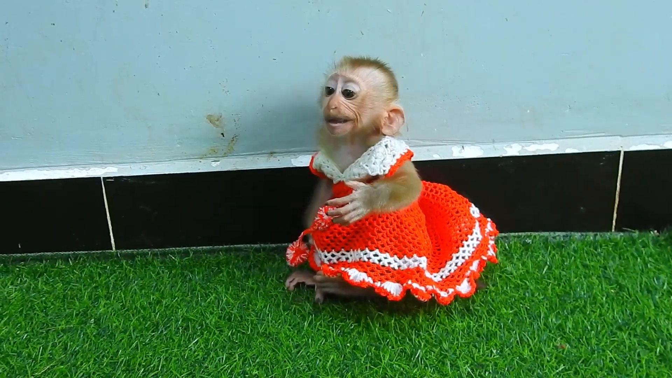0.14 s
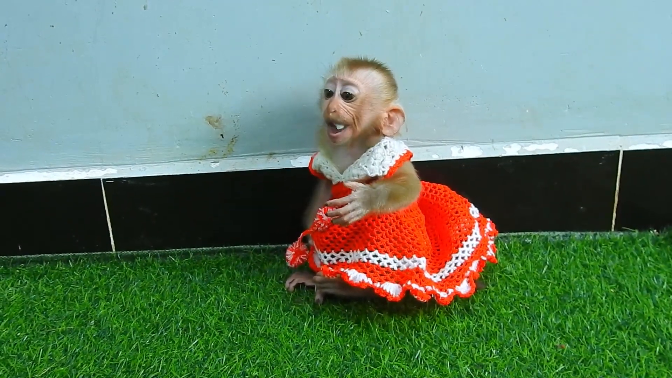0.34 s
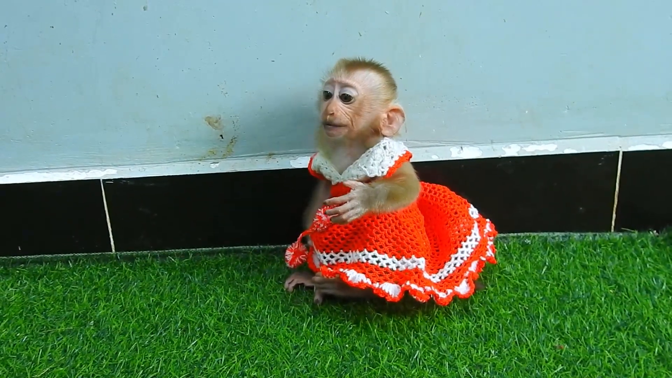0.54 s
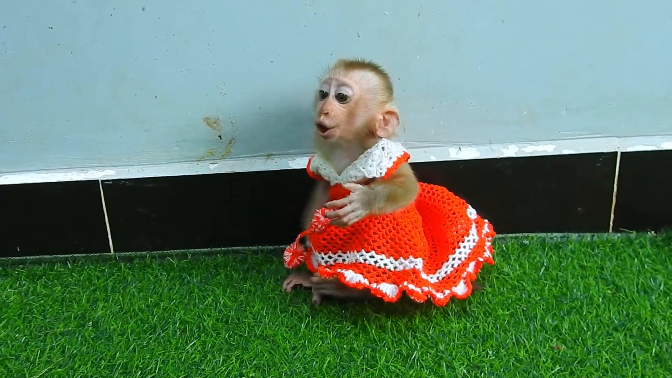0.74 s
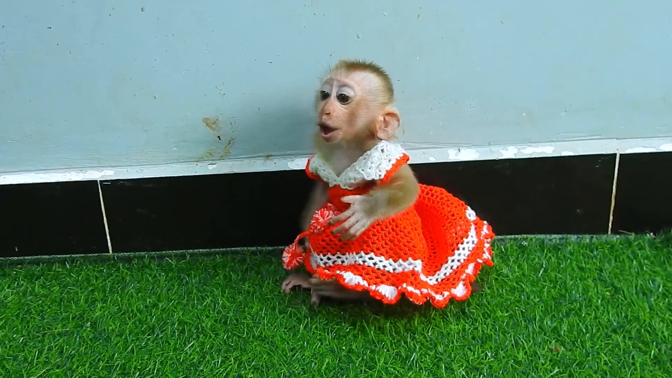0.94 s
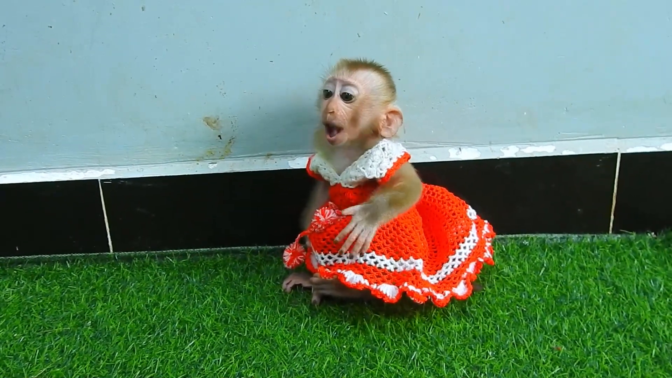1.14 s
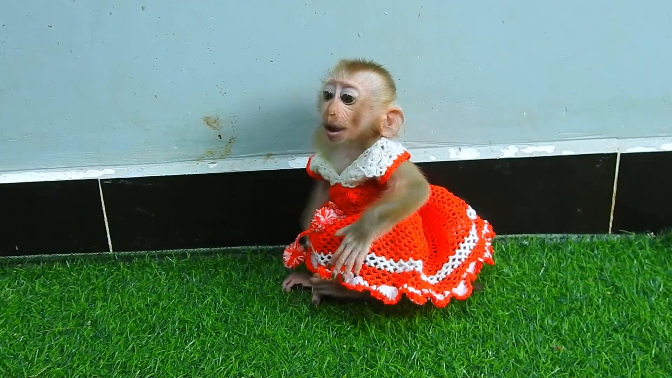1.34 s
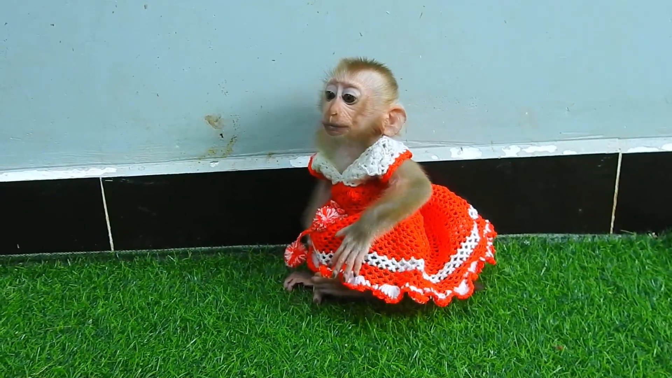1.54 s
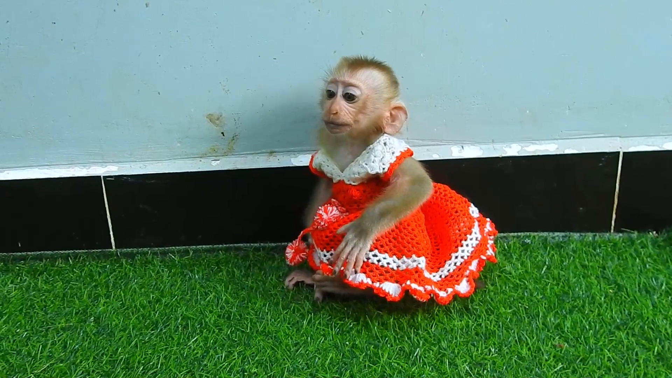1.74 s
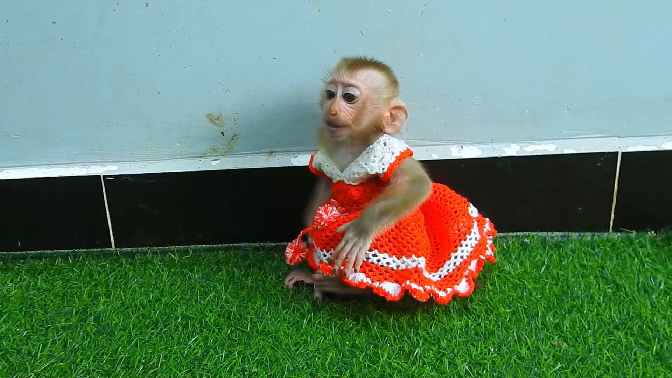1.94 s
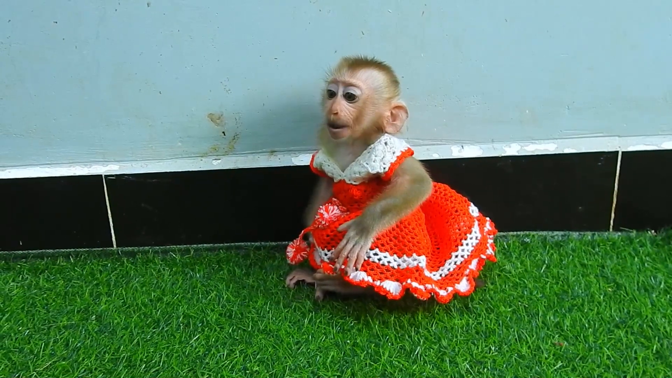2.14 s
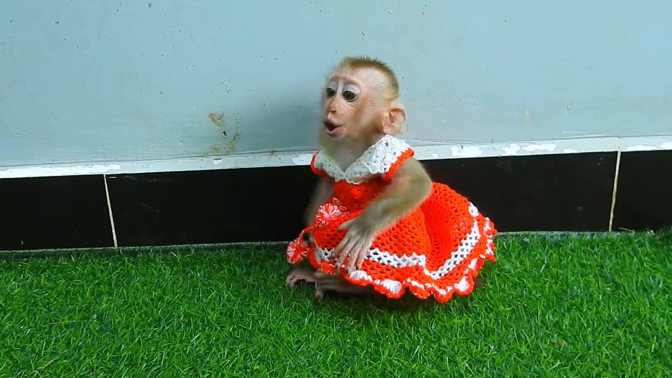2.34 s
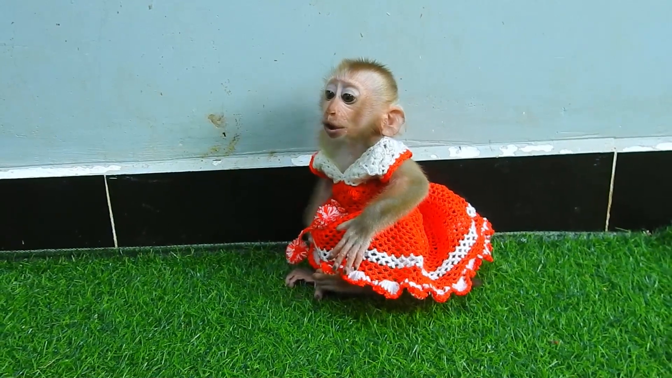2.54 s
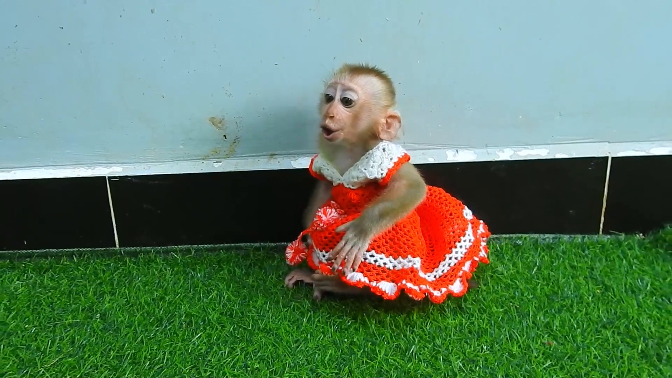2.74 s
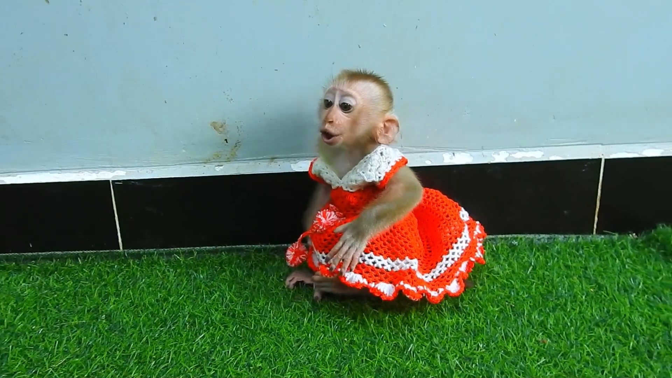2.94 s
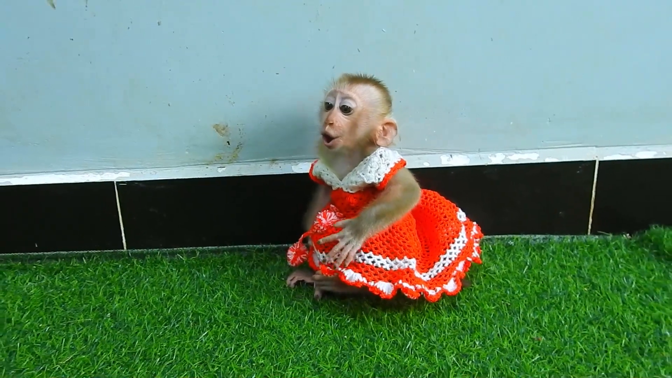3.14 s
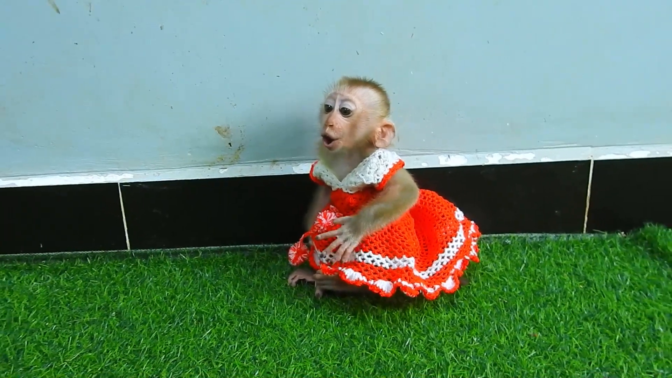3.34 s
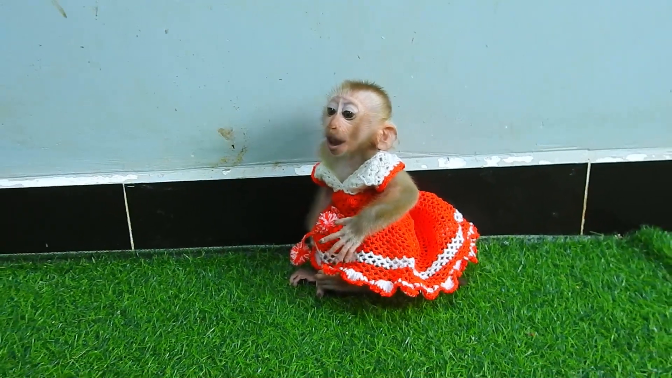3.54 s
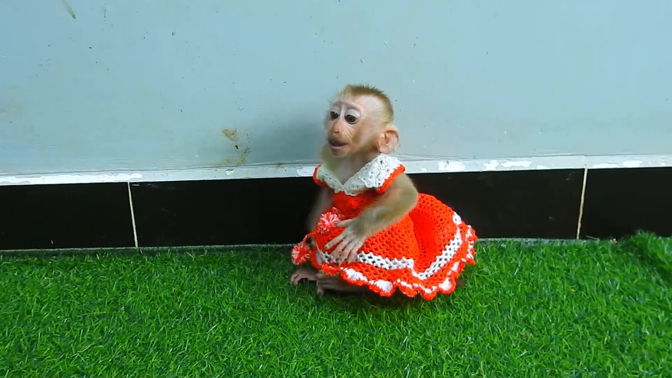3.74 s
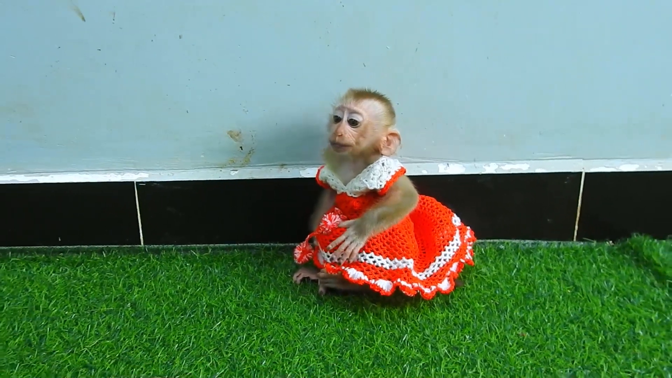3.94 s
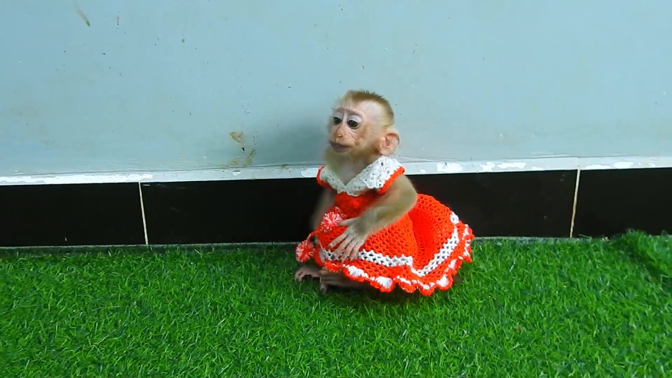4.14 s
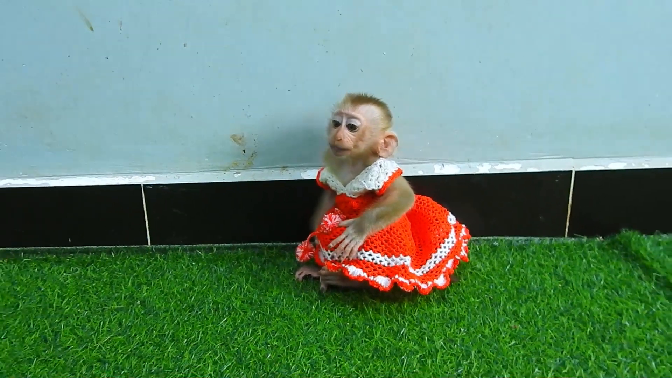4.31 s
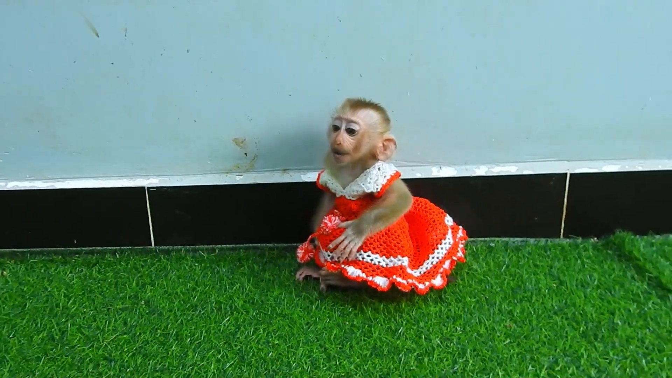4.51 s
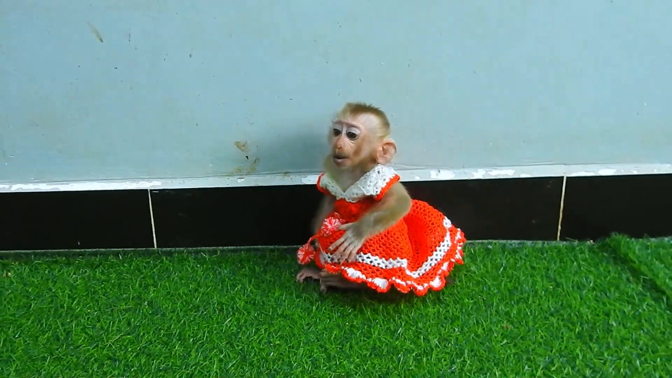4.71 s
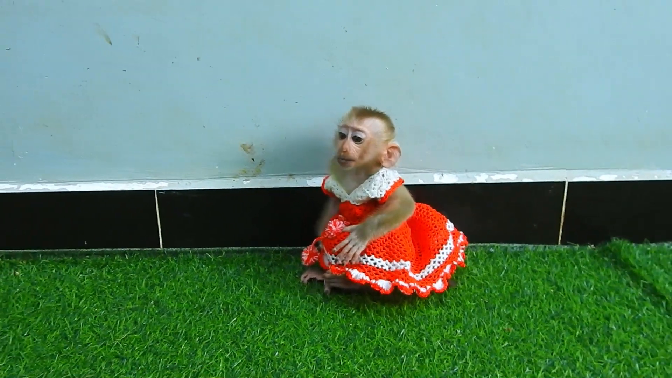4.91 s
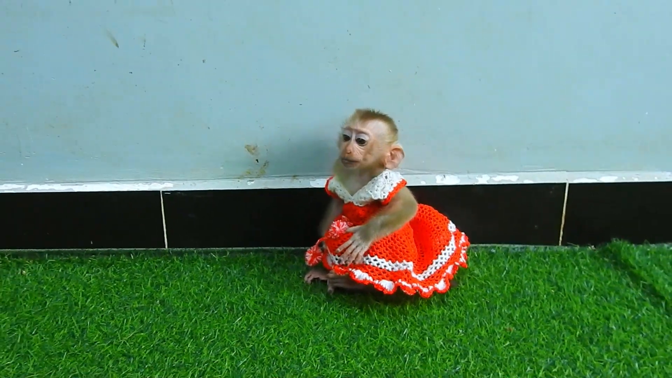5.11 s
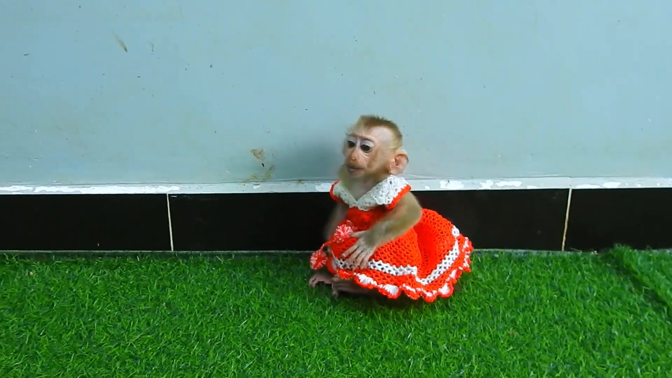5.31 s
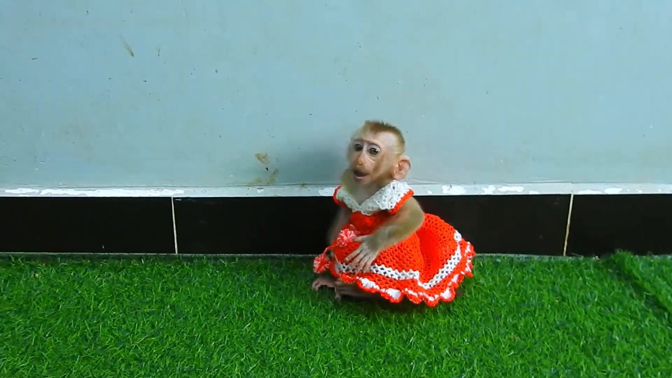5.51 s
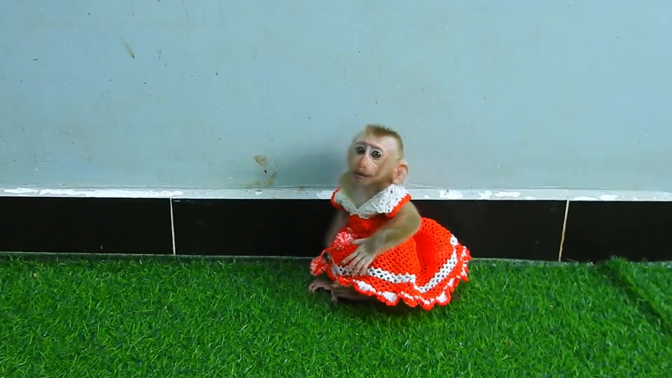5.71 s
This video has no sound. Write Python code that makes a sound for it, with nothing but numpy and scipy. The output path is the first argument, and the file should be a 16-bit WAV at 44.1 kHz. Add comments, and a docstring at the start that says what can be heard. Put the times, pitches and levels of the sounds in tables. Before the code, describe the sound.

A baby monkey calls, close and centered, in a quiet, hard-walled room. The first coo comes at about 0.7 seconds; after a pause, three more follow at 2.3, 2.8 and 3.2 seconds, the last two the loudest. Each lasts about a fifth of a second: a high, clear, almost pure tone that scoops up to pitch, then lifts and brightens a little, with a thin edge and a slight airy rasp. The last one rises furthest. The room rings for up to a second after each call and returns one soft, dull echo. A barely audible tick comes at 0.2 seconds, a small sharp click at the start of the second coo, and another at 4.6 seconds. A very soft brushing rustle follows from about 4.8 to 5.5 seconds. Faint room air and low wavering hums continue underneath until the end, near 6 seconds.

```python
"""A quiet, hard-walled room, where a baby monkey sits by a wall and gives four clear coos.
Each is a near-pure tone that scoops up to pitch; as the monkey presses, it gains a thin edge of
overtones, shaped by throat and mouth, over a slight rasp of air. The room rings on after each call
and returns one dull echo. Behind are a few small clicks, a soft rustle, low hums and faint room air."""
import sys
import numpy as np
from scipy import signal
from scipy.fft import rfft, irfft
from scipy.io import wavfile
from scipy.ndimage import uniform_filter1d, map_coordinates

SR = 44100
rng = np.random.default_rng(int(sys.argv[2]) if len(sys.argv) > 2 else 0)


def wav_record(signal):
    """Record a signal, one row per channel, as 16-bit PCM in the file named by sys.argv[1]."""
    frames = np.transpose(np.atleast_2d(signal))
    bounded = np.clip(frames, -1, 1)
    # unit amplitude maps onto the largest positive 16-bit level
    quanta = np.round(bounded * 32767).astype(np.int16)
    wavfile.write(sys.argv[1], SR, quanta)


N = 258852
TIME = np.arange(N) / SR


# Formants of throat and mouth, on the overtones from the third harmonic up: (f/Hz, gain/dB)
THROAT_FORMANTS = [(3000, 7), (3350, 5.5), (3600, -8), (4600, -18), (5600, -12.5), (6050, 3), (6500, 7.5),
                   (6950, 3), (7800, -9), (8300, -5.5), (9050, -20), (9600, -14.5), (10400, -36.5),
                   (11000, -29), (12200, -43.5), (15000, -45.5)]
# Colour of the breath in the voice: (f/Hz, relative level/dB)
RASP_COLOUR = [(300, -8), (800, -2.5), (1300, 3.5), (2300, -9.5), (3100, -1), (4100, -18), (5500, -22),
               (7400, -5), (9500, -17), (11000, -24.5), (15000, -34)]
# Coo cues; octave, edge and rasp ride on the base level, and coo() trims the tonal layers:
# (t/s, length/s, base f/Hz, scoop/Hz, base level/dB, press after/s, press time/s, press rise/Hz,
#  press swell/dB, closing bend/Hz, octave/dB, edge/dB, rasp/dB)
COO_CUES = [(0.744, 0.196, 1129, 107.6, -38.5, 0.097, 0.03, 101.8, 2, 22, -36, -26.5, -35),
            (2.317, 0.1777, 1178, 128, -40.5, 0.089, 0.04, 86.04, 5.5, -2.5, -26, -25, -41.5),
            (2.768, 0.1553, 1213, 79.3, -32.0, 0.101, 0.03, 44.5, 4.5, -2, -22, -22, -38),
            (3.214, 0.2, 1163, 103.6, -36, 0.12, 0.096, 185.2, 0, 7.5, -19.5, -23.5, -38.5)]

def coo(cue, tone_trim_db=4.5, octave_trim_db=-3, edge_trim_db=-2, jitter=0.0028):
    """One call starts gently, then the monkey presses: pitch, level and brightness rise together."""
    start, length, base_hz, scoop_hz, base_db, press_at, press_s, rise_hz, swell_db = cue[:9]
    bend_hz, octave_db, edge_db, rasp_db = cue[9:]
    attack_s, release_s, catch_db, catch_s = 0.0037, 0.013, 9.5, 0.012
    overshoot_s, settle_s, sag_hz_per_s, bend_s = 0.043, 0.023, 509, 0.018
    follow_db_per_hz, press_octave_db, press_edge_db = 0.1035, 6, 4
    live = (TIME > start) & (TIME < start + length + release_s)
    age = TIME[live] - start
    gate = np.clip(age / attack_s, 0, 1) * np.clip((length - age) / release_s + 1, 0, 1)
    press = (1 + np.tanh((age - press_at) / press_s)) / 2
    # the pitch scoops up, overshoots, settles, sags against the press and bends as the call closes
    scoop = scoop_hz * np.exp(-age / settle_s) * np.cos(np.pi * age / overshoot_s)
    bend = bend_hz * np.exp(np.minimum(age - length, 0) / bend_s)
    hz = base_hz - scoop + rise_hz * press - sag_hz_per_s * age + bend
    # loudness tracks the pitch, since both follow the air pressure
    level_db = base_db + follow_db_per_hz * (hz - base_hz) + swell_db * press
    level_db -= catch_db * np.exp(-age / catch_s)  # the voice starts weak and quickly catches
    level_db += 0.66 * drift(50)[live]  # slight waver
    octave_db += octave_trim_db + press_octave_db * press + 2.5 * drift(50)[live]
    phase = 2 * np.pi * np.cumsum(hz * (1 + jitter * drift(350)[live])) / SR
    tone = from_db(tone_trim_db) * np.sin(phase) + from_db(octave_db) * np.sin(2 * phase)
    overtones = sum(from_db(at_hz(THROAT_FORMANTS, k * hz)) * np.sin(k * phase) for k in range(3, 13))
    # the folds close a little unevenly, so the edge flutters more than the tone
    edge_db += edge_trim_db + press_edge_db * press + drift(250)[live]
    voice = np.sqrt(2) * (tone + from_db(edge_db) * overtones)
    # air escapes in a puff on each cycle, sputtering as it goes
    breath = from_db(rasp_db + 6.5 * drift(110)) * coloured(rng.standard_normal(N), RASP_COLOUR)
    rasp = breath[live] * (1 + np.cos(phase))
    out = np.zeros(N)
    out[live] = gate * from_db(level_db) * (voice + rasp)
    return out


# Reverb decay: (f/Hz, T60/s)
REVERB_DECAY = [(300, 0.65), (1200, 0.98), (2400, 0.74), (3600, 0.49), (7000, 0.67), (14000, 0.13)]
# Reverb return against the direct sound: (f/Hz, level/dB)
REVERB_RETURN = [(300, -10), (1200, -8), (2400, 0.5), (3600, -7.5), (7000, 0.5), (14000, -15)]

def room_reverb(x, predelay_s=0.0066, build_s=0.018):
    """Wall reflections thicken into a diffuse tail that dies sooner in the treble."""
    t = TIME[:SR + SR // 2]
    spectrum = rfft(stereo_noise(spread=1.4)[:, :len(t)])
    freqs = np.fft.rfftfreq(len(t), 1 / SR)
    onset = np.clip((t - predelay_s) / build_s, 0, 1)
    crossovers_hz = np.geomspace(200, 16000, 11)
    tail = 0
    for low, high in zip(crossovers_hz, crossovers_hz[1:]):
        hz = np.sqrt(low * high)
        decay = onset * from_db(-60 * t / at_hz(REVERB_DECAY, hz))
        band = irfft(spectrum * ((freqs >= low) & (freqs < high)), len(t))
        tail += band * decay / np.linalg.norm(decay) * from_db(at_hz(REVERB_RETURN, hz))
    return signal.fftconvolve(x[None], tail, axes=1)[:, :N]


def late_echo(x, delay_s=0.27, echo_db=-17, lowpass_hz=2500):
    """A distant surface sends back one soft, dull repeat."""
    delayed = np.interp(TIME - delay_s, TIME, x, left=0)
    return from_db(echo_db) * signal.sosfilt(signal.butter(2, lowpass_hz, fs=SR, output="sos"), delayed)


# Click cues: (t/s, peak level/dB, f/Hz, bandwidth/Hz)
CLICK_CUES = [(0.2347, -64, 7740, 1500), (2.3018, -59, 6720, 1280), (2.333, -49.5, 2970, 2000),
              (4.604, -54, 5200, 2500)]

def clicks(decay_s=0.0012):
    """Each click is a tiny crack, passed twice through one broad resonance."""
    out = np.zeros(N)
    t = TIME[:SR // 20]
    for start, peak_db, hz, width_hz in CLICK_CUES:
        crack = rng.standard_normal(len(t)) * np.exp(-t / decay_s)
        b, a = signal.iirpeak(hz, hz / width_hz, fs=SR)
        tick = signal.lfilter(b, a, signal.lfilter(b, a, crack))
        out[int(start * SR):][:len(tick)] += from_db(peak_db) * tick / np.abs(tick).max()
    return out


# Colour of the rustle: (f/Hz, relative level/dB)
BRUSH_COLOUR = [(1500, -11), (2700, -9.5), (3300, -2.5), (3900, -11), (4600, -4), (6500, 1.5), (7400, -4),
                (8500, -13.5), (10500, -24.5), (15000, -43)]
# Brush strokes: (t/s, length/s, level before the sag/dB, attack/s)
BRUSH_CUES = [(4.791, 0.31, -63, 0.046), (5.283, 0.14, -68, 0.11)]

def rustle(sag_db_per_s=9.5, release_s=0.13, grain_db=1.0):
    """Something soft brushes along in small catches."""
    strokes = 0
    for start, length, level_db, attack_s in BRUSH_CUES:
        sag_db = sag_db_per_s * np.maximum(TIME - start, 0)
        strokes += from_db(level_db - sag_db) * envelope(start, length, attack_s, release_s)
    return strokes * from_db(grain_db * drift(130)) * coloured(stereo_noise(), BRUSH_COLOUR)


def hum(hz, level_db, waver_db=2.5, wander_s=0.00047):
    """A low tone that wavers in level and, more so the higher it is, in pitch."""
    phase = 2 * np.pi * hz * (TIME + wander_s * drift(9.8))
    return np.sqrt(2) * from_db(level_db + waver_db * drift(4.2)) * np.sin(phase)


# Partials of the low drone: (f/Hz, level/dB)
DRONE_PARTIALS = [(100, -78), (168, -82.5), (210, -79), (338, -82)]
# Hums that swell and fade: (t/s, length/s, f/Hz, level/dB)
SWELL_CUES = [(-0.1, 0.69, 259.5, -75), (0.73, 0.26, 206.4, -72), (1.2, 1.9, 127.1, -72),
              (4.9, 1.0, 126.5, -73)]

def hum_bed(attack_share=0.2, release_share=0.46):
    """A constant low drone, with other hums fading in and out over it."""
    drone = sum(hum(hz, db) for hz, db in DRONE_PARTIALS)
    swells = sum(hum(hz, db) * envelope(start, length, attack_share * length, release_share * length)
                 for start, length, hz, db in SWELL_CUES)
    return drone + swells


# Colour of the room's still air: (f/Hz, relative level/dB)
AIR_COLOUR = [(26, -49.5), (42, -13), (70, -9), (100, -4.5), (145, -10.5), (200, -8.5), (420, -9),
              (900, -7), (1770, -13), (2600, -21.5), (3400, -20), (3950, -25), (4700, -23), (6900, -21.5),
              (8500, -34.5), (11000, -42), (15400, -48.5)]

def room_tone(level_db=-63):
    """Still air lays a faint, dark bed of noise under everything."""
    return from_db(level_db) * coloured(stereo_noise(), AIR_COLOUR)


# Stereo image of the room: (f/Hz, left-right correlation)
STEREO_IMAGE = [(30, .7), (80, 0.9), (1000, 0.94), (2200, 0.72), (4000, 0.7), (7000, 0.1), (14000, 0.13)]

def stereo_noise(spread=1):
    """White noise, narrow in the bass and wide in the treble; spread widens it further."""
    alike = np.clip(at_hz(STEREO_IMAGE, np.fft.rfftfreq(N, 1 / SR)), 0, 1) ** spread
    mid, side = rfft(rng.standard_normal((2, N)))
    return irfft(np.sqrt((1 + alike) / 2) * mid + np.sqrt((1 - alike) / 2) * side * [[1], [-1]], N)


def coloured(noise, colour):
    """EQ noise to a colour, at unit rms."""
    gain = from_db(at_hz(colour, np.fft.rfftfreq(N, 1 / SR)))
    return rms_one(irfft(rfft(noise) * gain, N))


def drift(rate):
    """Smooth random modulation at unit rms, changing about rate times a second."""
    knots = rng.standard_normal(N // 16)
    return rms_one(map_coordinates(knots, [TIME * rate], order=3, mode="mirror"))


def envelope(start, length, attack_s, release_s):
    """Rise, hold, then die away."""
    age = TIME - start
    return np.clip(age / attack_s, 0, 1) * np.exp(-np.maximum(age - length, 0) / release_s)


def at_hz(curve, hz):
    """Read a curve on a log-frequency axis."""
    freqs, values = np.transpose(curve)
    return np.interp(np.log(hz + 1e-9), np.log(freqs), values)


def from_db(db):
    """Decibels to gain."""
    return 10 ** (np.asarray(db) / 20)


def rms_one(x):
    """Scale to unit rms."""
    return x / np.sqrt(np.mean(x ** 2) + 1e-20)


def limiter(x, threshold_db=-30.0, window_s=0.01, squeeze=0.65):
    """The gain eases down above the threshold, flattening the loudest coos."""
    power = uniform_filter1d(np.mean(x ** 2, axis=0), int(window_s * SR))
    over_db = np.maximum(10 * np.log10(np.abs(power) + 1e-12) - threshold_db, 0)
    return x * from_db(-squeeze * over_db)


def scene():
    """The monkey is close and dead centre; the room answers from all round."""
    near = sum(coo(cue) for cue in COO_CUES) + clicks()
    return near + room_reverb(near) + late_echo(near) + rustle() + hum_bed() + room_tone()


def record(dry):
    """Master chain: a limiter, then a steep high cut."""
    cutoff_hz = 15600
    high_cut = signal.ellip(10, .1, 80, cutoff_hz, fs=SR, output="sos")
    return signal.sosfilt(high_cut, limiter(dry))


dry = scene()
out = record(dry)
wav_record(out)
```